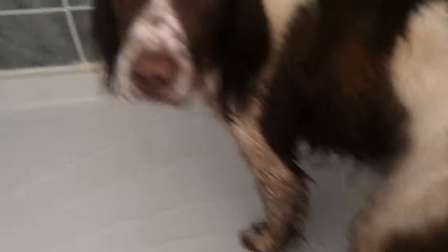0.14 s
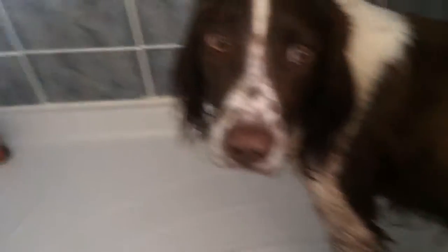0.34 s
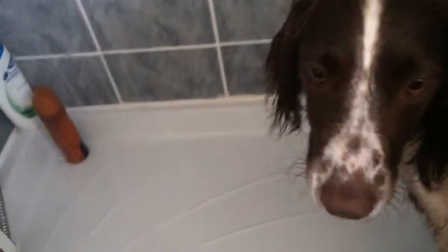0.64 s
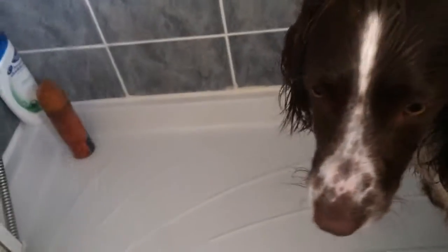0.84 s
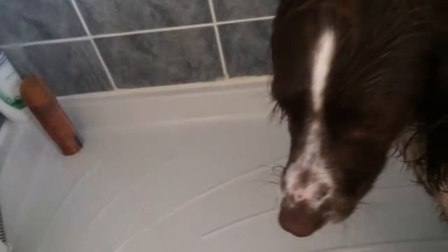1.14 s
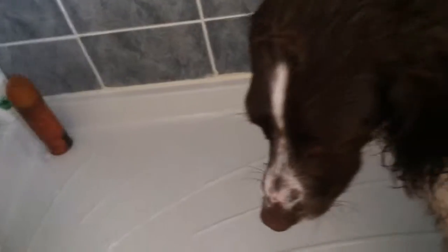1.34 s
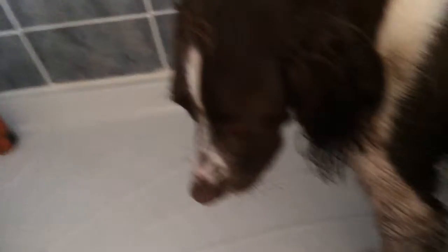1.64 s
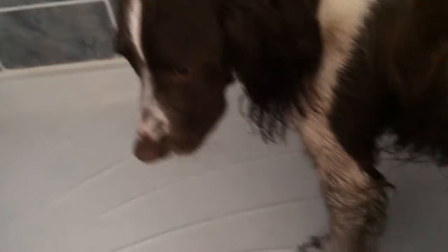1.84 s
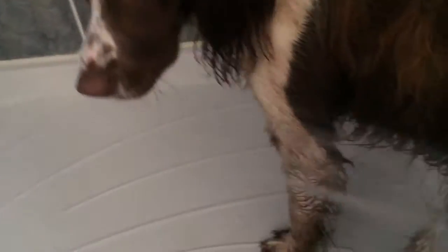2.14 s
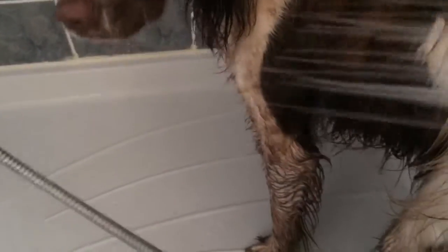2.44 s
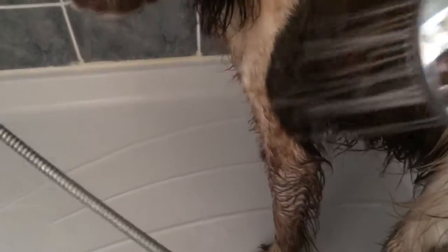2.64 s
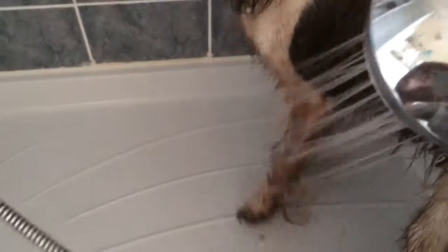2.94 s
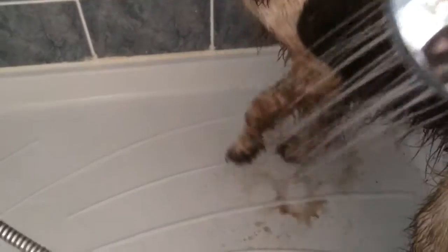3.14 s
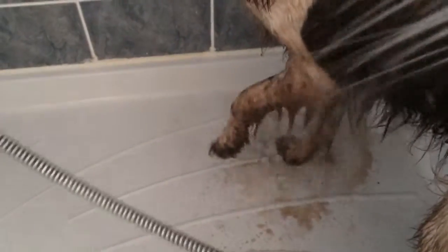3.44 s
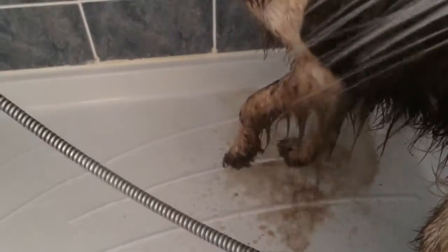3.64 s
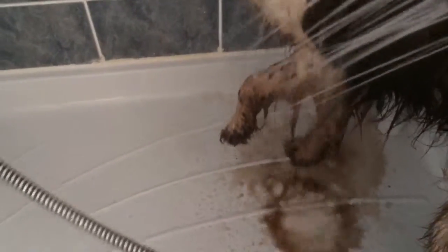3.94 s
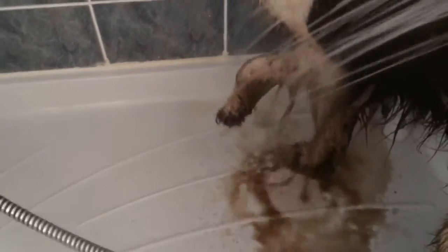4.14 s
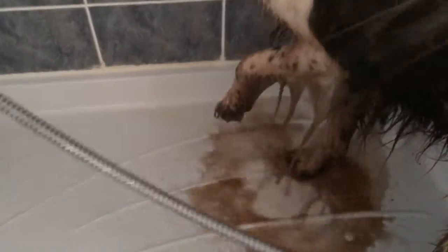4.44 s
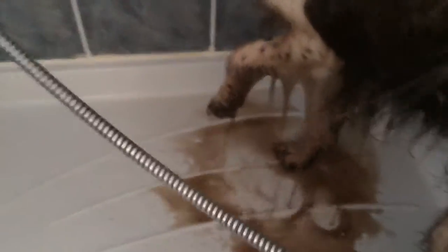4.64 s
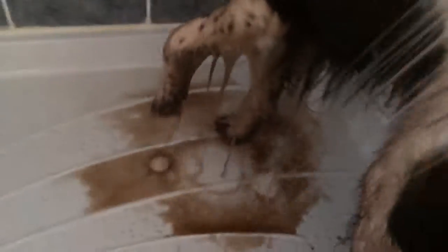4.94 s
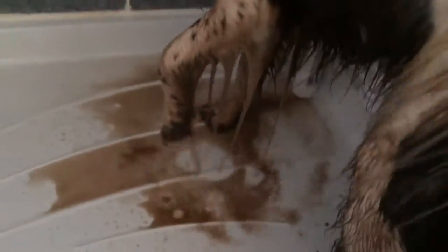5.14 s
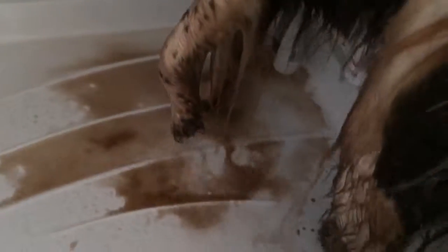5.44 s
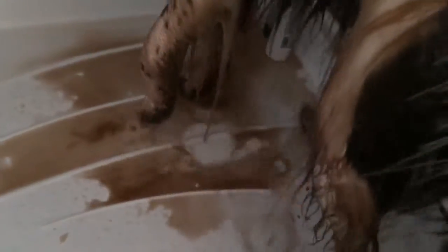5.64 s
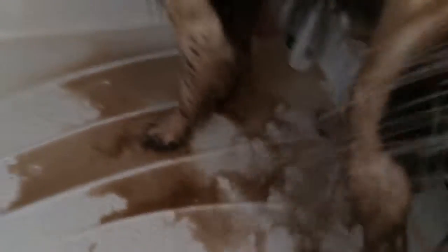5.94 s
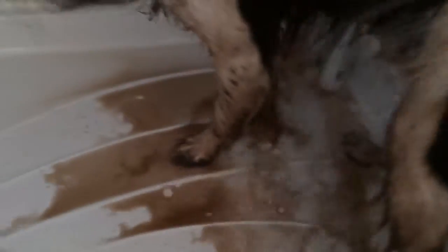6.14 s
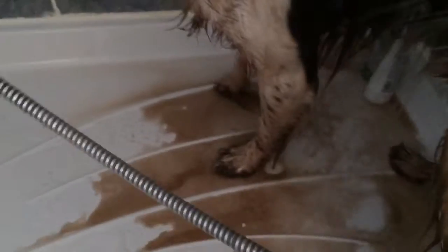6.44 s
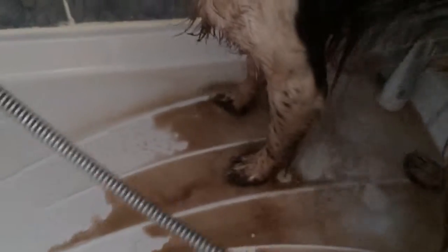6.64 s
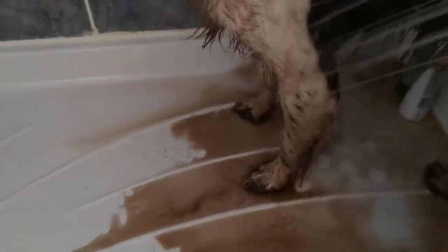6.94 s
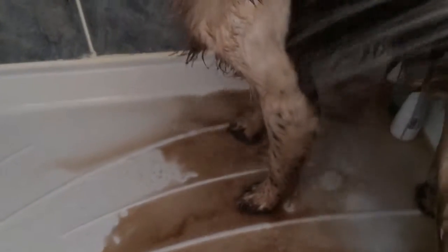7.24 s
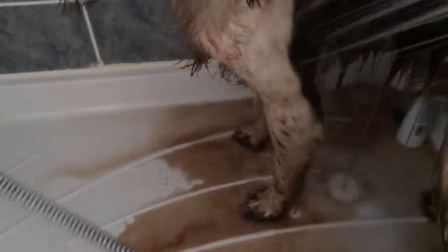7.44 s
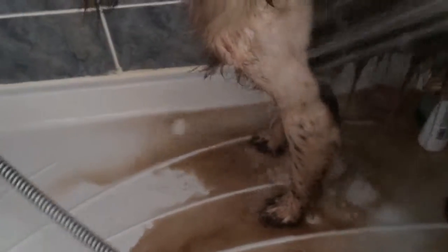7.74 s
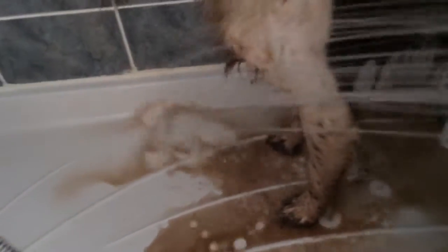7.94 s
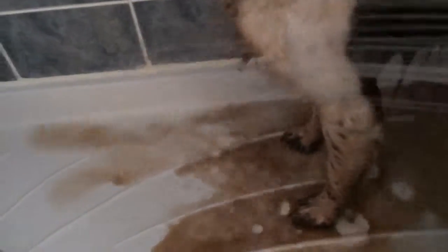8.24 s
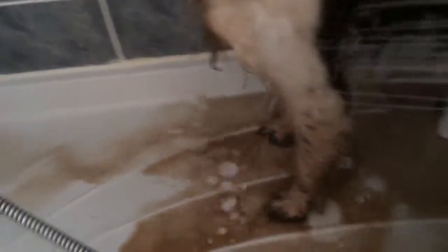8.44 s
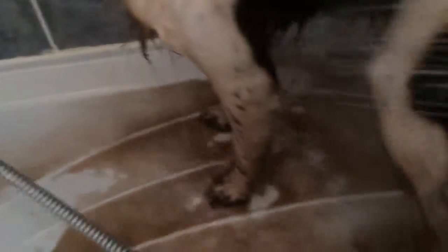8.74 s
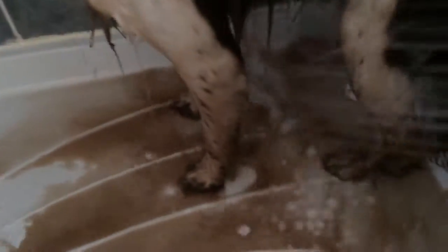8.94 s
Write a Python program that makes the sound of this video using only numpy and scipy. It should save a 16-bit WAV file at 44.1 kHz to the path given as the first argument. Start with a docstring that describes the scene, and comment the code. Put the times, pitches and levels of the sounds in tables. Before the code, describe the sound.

Close, bright shower spray sizzles over wet fur in a small tiled bathroom while runoff patters ever heavier onto a hollow plastic tray.

```python
"""A hand shower rinses a dog that stands in a plastic shower tray in a small tiled bathroom.
Its jets hiss, splash and sizzle on the wet coat: random impacts filtered to the colour of each.
Water that gets past patters on the tray, stirs the puddle and makes the shell ring over a low rumble.
Fat drops tick near the microphone, gobs slap, a claw taps once, and dull knocks come as the dog
shifts its paws. Short echoes from the tiles follow the water; both channels are alike."""
import sys
import numpy as np
from scipy import signal
from scipy.fft import rfft, irfft
from scipy.io import wavfile
from scipy.ndimage import uniform_filter1d

SR = 44100
rng = np.random.default_rng(int(sys.argv[2]) if len(sys.argv) > 2 else 0)


def persist_wave(psi):
    """Save psi, clipped to +-1, as 16-bit WAV."""
    counts = np.round(np.clip(psi, -1, 1) * 32767).astype(np.int16)
    wavfile.write(sys.argv[1], SR, np.atleast_2d(counts).T)


N = 401310

# Levels in the tables are nominal: each layer adds its own trim and drift.
# Jets on the coat, weakest while they swing off the dog: (time [s], fine spray [dB], splash [dB])
JETS = [(0, -35, -46.5), (1.05, -32, -45), (1.55, -34, -43), (1.73, -43, -48), (1.87, -39, -44),
        (2.06, -36, -37.5), (2.29, -32, -46), (2.5, -34, -37.5), (3.1, -31, -42.5), (3.42, -36, -43.5),
        (3.62, -30, -36.5), (4.2, -33.5, -39.5), (4.8, -31.5, -39.5), (5.5, -32.5, -39), (5.92, -33, -40.5),
        (6.4, -32, -39), (6.9, -32.5, -37), (7.45, -32.5, -37), (8.2, -30, -36.5), (8.65, -33, -38.5),
        (9.1, -31.5, -36)]
# Sweeps of the hand briefly swell or thin the water on coat and tray; a negative change is a dip:
# (time [s], half length [s], spray change [dB], patter change [dB])
SWEEPS = [(0.05, 0.17, 3, 0.5), (.43, 0.054, 4, 0.5), (0.592, 0.047, 4, 2), (1.39, 0.055, -0.5, 6.5),
          (1.46, 0.056, 5, 3.5), (1.53, .025, -4, 8), (1.733, 0.039, -2.5, 0), (2.266, 0.026, -7.5, 0),
          (2.658, 0.068, 5.5, 7.5), (2.74, 0.048, 4, 6), (2.902, 0.033, 2.5, 1.5), (3.03, 0.019, 1.5, 5.5),
          (3.35, 0.084, 1, 1.5), (3.95, 0.04, 4.5, 0.5), (4.133, .025, 1.5, 0), (4.317, 0.024, -0.5, 5),
          (4.454, 0.042, 4, 6), (4.74, 0.015, -4, 0.5), (4.975, 0.11, 4, 2), (5.104, 0.036, -4, 1.5),
          (5.303, 0.17, 3.5, 2), (5.743, 0.094, 3, 5.5), (6.105, 0.11, 3, -2.5), (6.505, 0.043, 4.5, 1.5),
          (6.713, 0.066, 2.5, 1.5), (6.884, 0.058, -0.5, 1), (7.344, 0.07, 0.5, 0), (7.668, 0.06, -1, -1),
          (7.835, 0.05, 3.5, -4), (8.423, 0.07, 3.5, 1), (8.795, 0.072, 3.5, 1.5)]
# The jets bite into a soaked spot and sizzle: (time [s], attack [s], decay [s], level [dB])
SIZZLES = [(0.39, .04, .04, -47), (1.505, 0.027, 0.03, -41), (1.895, 0.0092, 0.037, -38),
           (2.585, 0.055, .15, -42), (4.85, .16, 0.027, -33.5), (5.15, 0.25, .12, -44),
           (7.29, .04, 0.21, -39), (8.74, 0.077, .08, -37)]
# The jets dwell in a hollow of the wet coat, which rings:
# (time [s], half length [s], level [dB], pitch [Hz], width [octaves])
HOLLOWS = [(1.375, 0.025, -40, 2360, 0.14), (1.42, .025, -43, 1850, 0.42), (1.58, .035, -48, 2380, .25),
           (2.68, 0.04, -39, 1930, .22), (4.97, 0.034, -35, 1900, .25), (5.62, 0.2, -36.5, 1970, 0.23),
           (7.34, 0.059, -37, 2230, .25), (7.41, 0.031, -32.5, 1500, 0.31),
           (7.67, 0.079, -32.5, 1540, 0.23), (7.84, 0.074, -43.5, 1500, 0.22),
           (8.412, 0.019, -33, 1890, .2), (8.775, 0.017, -38, 1690, 0.23), (8.91, .03, -38, 1930, .25),
           (9.075, .02, -45, 2100, .25)]
# Water that gets past the dog and patters on the tray: (time [s], level [dB])
RUNOFF = [(0, -42.5), (1.25, -40.5), (1.55, -45), (1.65, -48), (1.83, -47), (1.92, -40.5), (2.15, -38.5),
          (2.3, -44.5), (2.55, -44.5), (2.8, -39), (3.2, -41), (3.38, -37.5), (3.5, -36.5), (3.85, -35.5),
          (4.25, -39), (4.75, -37.5), (5.15, -40.5), (5.42, -34.5), (5.77, -38), (5.98, -36.5), (6.38, -31),
          (7.15, -35), (7.7, -34), (7.95, -41.5), (8.33, -41), (8.36, -38), (8.55, -37.5), (8.66, -39.5),
          (8.82, -37.5), (9.1, -38)]
# The patter brightens on a thin film and darkens on deeper water: (time [s], centre [Hz])
FILM_PITCH = [(0, 1690), (1.18, 1560), (1.38, 1750), (2.3, 1630), (2.62, 1820), (2.8, 1720), (3.6, 1850),
              (3.86, 1440), (4.1, 1640), (5.15, 1800), (5.4, 1500), (5.98, 1800), (6.15, 1510), (6.9, 1500),
              (7.12, 1780), (7.65, 1600), (8.45, 1890), (8.58, 1410), (8.74, 1560), (8.92, 1850),
              (9.1, 1900)]
# A stream digs into the puddle and churns it: (time [s], half length [s], level [dB])
PLUNGES = [(2.11, .06, -52), (2.85, 0.65, -54.5), (3.84, 0.16, -47), (4.49, 0.063, -46),
           (6.52, 0.33, -43.5), (6.8, 0.23, -40.5), (7.25, 0.031, -39), (7.58, 0.16, -41.5),
           (8.58, 0.066, -45), (8.72, 0.11, -48)]
# Water drums on the plastic shell, strongest at the start, weaker and uneven later:
# (time [s], level [dB])
DRUMMING = [(0, -45), (1.4, -45), (1.66, -50), (1.78, -56.5), (2.6, -58.5), (3.12, -51.5), (3.7, -55),
            (5.55, -59), (6.0, -53), (7.2, -52), (7.8, -55.5), (9.1, -52.5)]
# Low rumble of the flow: (time [s], level [dB])
FLOW = [(0, -55), (2.2, -55.5), (2.7, -62), (3.2, -58.5), (4.2, -53.5), (5.2, -58.5), (6.0, -54),
        (9.1, -56)]
# The jets cross bare plastic and make it boom:
# (time [s], half length [s], level [dB], pitch [Hz], width [octaves])
BOOMS = [(1.08, .05, -45, 370, 0.34), (1.18, 0.047, -37.5, 350, 0.19), (1.31, .035, -41, 343, 0.24),
         (1.39, 0.073, -37, 428, 0.23), (1.44, 0.08, -39.5, 360, 0.28), (1.655, 0.047, -48.5, 340, .6),
         (2.25, 0.092, -57.5, 420, 0.44), (5.15, 0.19, -54, 455, 0.3), (5.3, 0.038, -53, 390, .7)]
# Modes of the tray: (pitch [Hz], level [dB], 60 dB decay [s])
TRAY_MODES = [(63, -22, 0.23), (81.7, -3, 0.37), (119, -3.5, 0.19), (157.4, 4.5, 0.14), (172.3, 3.5, 0.44),
              (218, 0, 0.45), (244.8, 2.5, 0.68), (280.4, 1.5, 0.12), (321.8, 0, 0.45), (352, -3, 0.29),
              (390, -3.5, 0.24), (418.7, 1.5, 0.17), (466, 1.5, 0.082), (507, 0.5, 0.11), (590, 0, 0.15),
              (647, -2, 0.073), (710, -0.5, 0.096)]
# Single fat drops near the microphone: (time [s], peak [dB], pitch [Hz], fade of the crack [s])
DROPS = [(0.02, -16.5, 9000, .002), (0.079, -14.5, 9800, .002), (0.28, -19, 10000, .001),
         (0.43, -18, 9400, 0.00089), (0.517, -19, 11500, .0006), (0.566, -16, 12200, .002),
         (0.58, -15, 8500, .002), (0.637, -16, 12600, .0015), (0.714, -20, 9500, .002),
         (0.773, -13, 11500, .0006), (1.201, -16, 11600, .0015), (2.028, -24, 6500, .002),
         (2.314, -22, 7500, .002), (2.875, -19, 12000, .001), (2.906, -19, 8500, .001),
         (2.981, -22, 7950, 0.0019), (3.11, -15.5, 9300, .002), (3.318, -19, 11600, .0008),
         (3.858, -16, 10000, .0003), (3.97, -13, 10400, .0005), (4.126, -19, 10000, .0004),
         (4.432, -19, 10000, .0003), (4.596, -14, 11500, .0006), (5.279, -11, 12300, .0007),
         (6.618, -19.5, 5500, .002), (6.663, -15, 11200, .0015), (6.745, -14, 11500, .0002),
         (7.015, -18.5, 10100, .002), (7.075, -19, 5700, .002), (7.152, -19, 6400, 0.0018),
         (7.68, -21, 9000, .002), (7.874, -12, 7350, 0.0022), (7.939, -13, 10300, .0005),
         (8.22, -19, 5000, .002), (8.375, -25, 7440, 0.0018), (8.5, -16, 11400, .0007),
         (8.895, -13, 10100, .001), (9.02, -21, 5500, 0.0022)]
# Gobs of water slapping the tray:
# (time [s], peak [dB], pitch [Hz], width [octaves], gain of the tail [dB])
SLAPS = [(0.411, -29, 2300, 0.37, -20), (0.684, -33, 975, 0.23, -17), (1.347, -25, 1390, 2.1, 3),
         (1.517, -25, 2460, 1.3, -1), (2.624, -18, 3600, 0.58, -20), (2.723, -22, 1800, .8, 0),
         (2.891, -34, 1100, .6, -12), (3.035, -22.5, 1700, 0.55, -5), (3.838, -23, 1350, 0.54, -7),
         (6.497, -23, 1350, .7, -10), (6.55, -19, 1400, .8, -10), (6.803, -21.5, 990, .6, -10),
         (6.863, -20, 4300, 0.6, -8), (7.251, -24, 1250, .7, -13), (7.0, -22, 1560, .5, -12),
         (8.572, -27, 1100, 0.47, -8)]
# Dull knocks on the tray: (time [s], peak [dB], pitch of the push [Hz], ring against the push [dB])
KNOCKS = [(1.029, -29, 80, 18), (1.083, -33, 140, 18), (1.176, -27.5, 119, 20), (5.897, -36, 159, -8),
          (7.096, -36.5, 135, -9), (8.66, -34.5, 125, -2), (9.06, -43, 165, 1)]
# A claw taps the tray: (peak [dB], pitch of the tick [Hz], ring against the tick [dB])
TAP = (-23.5, 2100, 1.5)
# What the tap rings with: (pitch [Hz], level [dB], 60 dB decay [s])
TAP_MODES = [(1626, -1, 0.091), (1770, -7, .07), (1560, -6, .08)]
# Colours of the impacts, relative levels: (frequency [Hz], level per Hz [dB])
MIST_COLOUR = [(2500, -56), (5000, -9), (7000, -4.5), (9000, -1.5), (11000, 2.5), (13000, 3), (15000, 4.5),
               (17000, 0.5)]
SPLASH_COLOUR = [(1500, -23), (2400, -0.5), (3200, -9.5), (4300, 2.5), (5500, 0), (7000, 4.5), (9000, 0),
                 (14000, -10.5)]
SIZZLE_COLOUR = [(2000, -16), (2700, -9), (3050, -3.5), (3400, -1), (3900, -1), (4400, -6), (4900, -11.5),
                 (8000, -14.5)]
PATTER_COLOUR = [(600, -14.5), (950, -13), (1250, 1), (1550, -0.5), (1800, -0.5), (2150, -0.5),
                 (2400, -1.5), (2700, -3), (4000, 1), (8000, -39.5)]
PUDDLE_COLOUR = [(350, -27), (560, -12.5), (660, -3), (820, 0), (950, 3.5), (1100, 3.5), (1350, -3),
                 (1700, -10), (2500, -12.5)]
RUMBLE_COLOUR = [(20, -23), (45, -12), (62, -3), (82, 2), (98, -3.5), (112, 4), (135, -10.5), (172, -3),
                 (200, -7.5), (400, -18), (1000, -27.5)]

SPLASH_TYPICAL_DB = -40  # splash level from which the force of the jets is counted
SPLASH_SHARE = 0.7  # share of a sweep's spray change that the coarser splash follows
TICKS_PER_S, TICK_DB = 76, -10  # larger drops flung off the coat; level against the splash
PRICKS_PER_S, PRICK_DB = 200, -14  # small hard droplets near by; level against the fine spray
PUDDLE_UNDER_PATTER_DB = -13.5  # between plunges the puddle stirs with the patter
PUDDLE_UNDER_DRUMMING_DB = -2  # and with the water that drums on the shell
# lumps in the runoff: their power against the steady drops, reached at this level of flow
GOB_SHARE, GOB_FULL_DB = 0.51, -38
# gain and length of a drop's scatter against its crack; width of both
DROP_TAIL_DB, DROP_TAIL_RATIO, DROP_OCTAVES = -11, 8.9, 0.99
# a slap's contact, the ring of the tray after it, the ring's pitch against the slap's
SLAP_FADE_S, SLAP_TAIL_S, SLAP_TAIL_PITCH = 0.0085, 0.055, 0.886
TAP_S = 1.6586
BATHROOM_T60_S, TILE_CUT_HZ = 0.46, 3300
CUTOFF_HZ = 15350


def from_db(db):
    """Decibels to gain."""
    return 10 ** (np.asarray(db) / 20)


def rms_one(x):
    """Scale to unit power."""
    return x / np.sqrt(np.mean(x ** 2) + 1e-20)


def in_time(rows):
    """One value per sample for each column of a curve."""
    s, *columns = np.transpose(rows)
    return [np.interp(np.arange(N) / SR, s, column) for column in columns]


def drift(rate):
    """Slow chance with spread 1: noise low-passed at about rate in Hz."""
    step = 40  # samples between the points of the slow curve
    r = np.exp(-2 * np.pi * step * rate / SR)
    noise = rng.standard_normal(N // step + 2002)
    slow = signal.lfilter([1], [1, -2 * r, r * r], noise)[2000:]  # drop the settling time
    return np.interp(np.arange(N) / step, np.arange(len(slow)), rms_one(slow))


def colour(x, spectrum, size=2048):
    """Causal (minimum-phase) filter with the given spectrum; rms 1."""
    hz, db = np.transpose(spectrum)
    grid = np.maximum(np.arange(size // 2 + 1) * SR / size, 1)
    # past either end of the table it falls 10 dB an octave
    octaves_beyond = np.abs(np.log2(grid / np.clip(grid, hz[0], hz[-1])))
    grid_db = np.interp(np.log(grid), np.log(hz), db) - 10 * octaves_beyond
    # folding the cepstrum onto positive time gives minimum phase
    cepstrum = irfft(np.log(from_db(grid_db)))
    cepstrum[1:size // 2] *= 2
    cepstrum[size // 2 + 1:] = 0
    response = irfft(np.exp(rfft(cepstrum)))
    return rms_one(signal.oaconvolve(x, response)[:N])


def band(x, hz, octaves):
    """Keep a band of some octaves around a pitch."""
    edges = hz * 2 ** (np.array([-.5, .5]) * octaves)
    edges = np.minimum(edges, [.4 * SR, .45 * SR])
    return signal.sosfilt(signal.butter(2, edges, "band", fs=SR, output="sos"), x)


def high_pass(x, hz, order):
    """Keep what lies above a frequency."""
    return signal.sosfilt(signal.butter(order, hz, "high", fs=SR, output="sos"), x)


def ring(x, hz, t60):
    """A unit click sets a sine of height 1 ringing, 60 dB down after t60 seconds."""
    r, w = from_db(-60 / (t60 * SR)), 2 * np.pi * hz / SR
    return signal.lfilter([0, np.sin(w)], [1, -2 * r * np.cos(w), r * r], x + 1e-18)


def moving_resonance(x, hz, width_hz, size=256):
    """A two-pole resonance whose centre follows hz block by block; rms 1."""
    r = np.exp(-np.pi * width_hz / SR)
    state, out = [0., 0.], np.zeros(N)
    for i in range(0, N, size):
        poles = [1, -2 * r * np.cos(2 * np.pi * hz[i] / SR), r * r]
        out[i:i + size], state = signal.lfilter([1, 0, -1], poles, x[i:i + size], zi=state)
    return rms_one(out)


def impacts(per_s, spread_db):
    """Drops land at random as clicks of either sign, their sizes in dB spread exponentially; rms 1."""
    sizes = from_db(spread_db * np.minimum(rng.exponential(1, N), 5))
    signs = rng.choice([-1, 1], N)
    return rms_one(sizes * signs * (rng.random(N) < per_s / SR))


def ticks(spectrum, per_s, spread_db, fade_s):
    """Drops shatter: each is noise that starts at once and fades in milliseconds; rms 1."""
    hits = impacts(per_s, spread_db) ** 2 + 1e-18
    power = signal.lfilter([1], [1, -np.exp(-2 / (fade_s * SR))], hits)
    return colour(np.sqrt(power) * rng.standard_normal(N), spectrum)


def gobs(per_s, spread_db, fade_s):
    """Power of random lumps of water, each landing at once and dying away; mean about 1."""
    keep = np.exp(-2 / (fade_s * SR))
    return signal.lfilter([1 - keep], [1, -keep], impacts(per_s, spread_db) ** 2 + 1e-18)


def bubbles(per_s, low_hz, high_hz, cycles, spread_db, size=2048):
    """Each trapped bubble rings for some cycles at a pitch of its own, rising a little; rms 1."""
    out, t = np.zeros(N + size), np.arange(size) / SR
    for when, pitch, chance in rng.random((int(per_s * N / SR), 3)):
        turns = low_hz * (high_hz / low_hz) ** pitch * t
        age = turns / cycles  # 1 when the ring is 60 dB down
        loudness = from_db(spread_db * min(-np.log(1 - chance), 4))
        tone = np.sin(2 * np.pi * turns * (1 + .04 * age))
        at = int(when * N)
        out[at:at + size] += loudness * tone * from_db(-60 * age)
    return rms_one(out[:N])


def burst(fade_s, size=8192):
    """A contact: noise, as of a cluster of tiny impacts, that dies away."""
    return rng.standard_normal(size) * np.exp(-np.arange(size) / (fade_s * SR))


def add(out, s, sound, peak_db):
    """Mix a short sound in at time s with the given peak."""
    at = round(s * SR)
    out[at:at + len(sound)] += (from_db(peak_db) * sound / np.abs(sound).max())[:N - at]


def swell(s, half_s):
    """A bell-shaped rise and fall of height 1 around time s."""
    out = np.zeros(N)
    first = max(int((s - 4 * half_s) * SR), 0)
    last = min(int((s + 4 * half_s) * SR), N)
    near = np.arange(first, last)
    out[near] = np.exp(-((near / SR - s) / half_s) ** 2)
    return out


def swells(rows):
    """Summed gain of swells; rows are (time [s], half length [s], level [dB])."""
    return sum(from_db(db) * swell(s, half_s) for s, half_s, db in rows)


def hums(rows):
    """A rain of drops keeps resonances going for a moment each; rows as in HOLLOWS and BOOMS."""
    rain = impacts(per_s=3000, spread_db=3.0) + 1e-18
    out = np.zeros(N)
    for s, half_s, db, hz, octaves in rows:
        out += from_db(db) * swell(s, half_s) * rms_one(band(rain, hz, octaves))
    return out


def sweep_changes():
    """Change in dB that sweeps of the hand make to the spray and to the patter; negative is a dip."""
    return sum(np.outer(changes_db, swell(s, half_s)) for s, half_s, *changes_db in SWEEPS)


def spray(change_db):
    """Thousands of droplets a second burst on the coat, in flurries as the jets sweep over tufts of fur."""
    mist_db, splash_db = in_time(JETS)
    tufts_db = 0.5 * drift(19)
    mist_db = mist_db + change_db + tufts_db + 1.3 * drift(12)
    splash_db = splash_db + SPLASH_SHARE * change_db + tufts_db
    flurry = drift(59)
    return (fine_spray(mist_db, flurry) + splashes(splash_db, flurry) + sizzle(splash_db)
            + flung_drops(splash_db))


def fine_spray(mist_db, flurry):
    """Fine droplets hiss as dense small impacts, with sparser hard droplets pricking through near by."""
    mist = colour(impacts(per_s=16000, spread_db=3.5), MIST_COLOUR)
    pricks = ticks(MIST_COLOUR, PRICKS_PER_S, spread_db=-2.5, fade_s=0.00039)
    mist = mist + from_db(PRICK_DB) * pricks
    # the finest droplets hang in the air and follow the jets only loosely
    finest = high_pass(mist, 11000, order=1)
    loose_db = uniform_filter1d(mist_db, size=6000) + 0.43 * drift(25)
    direct_gain = from_db(mist_db + 1.1 + 0.95 * flurry)
    finest_gain = from_db(loose_db - 0.3 + 0.28 * flurry)
    return (mist - finest) * direct_gain + finest * finest_gain


def splashes(splash_db, flurry):
    """Coarser drops burst on the coat, a little less spread in level than the jets."""
    force_db = splash_db - SPLASH_TYPICAL_DB
    level_db = splash_db - 0.12 * force_db - 1.5 + 0.18 * flurry + 1.7 * drift(3.7)
    return colour(impacts(per_s=5000, spread_db=2.0), SPLASH_COLOUR) * from_db(level_db)


def sizzle(splash_db):
    """Sizzling grows faster with the force of the jets than splashing does, and surges on soaked spots."""
    force_db = splash_db - SPLASH_TYPICAL_DB
    gain = np.hypot(from_db(splash_db + 0.4 * force_db - 6.0), sizzle_surges())
    grains = colour(impacts(per_s=5000, spread_db=2.5), SIZZLE_COLOUR)
    return grains * gain * from_db(1.6 * drift(8.0))


def sizzle_surges():
    """Gain of the sizzles: each rises straight and dies away."""
    t, gain = np.arange(N) / SR, np.zeros(N)
    for s, attack_s, decay_s, db in SIZZLES:
        rise = np.clip((t - s) / attack_s, 0, 1)
        fall = np.exp(-np.maximum(t - s - attack_s, 0) / decay_s)
        gain += from_db(db) * rise * fall
    return gain


def flung_drops(splash_db):
    """Larger drops flung off the coat shatter one by one."""
    drops = ticks(SPLASH_COLOUR, TICKS_PER_S, spread_db=3.0, fade_s=0.0048)
    return drops * from_db(splash_db + TICK_DB)


def runoff(change_db):
    """Drops slap the film on the tray and stir the puddle; heavy runoff lands in lumps and traps bubbles."""
    steady_db, = in_time(RUNOFF)
    # only a heavy runoff falls in lumps and traps many bubbles
    weight = from_db(np.minimum(steady_db - GOB_FULL_DB, 0))
    return patter(steady_db + change_db, weight) + puddle(steady_db, weight) + hums(HOLLOWS)


def patter(patter_db, weight):
    """Drops and bubbles on the film of water sound through a resonance that moves with its depth."""
    film_hz = in_time(FILM_PITCH)[0] + 70 * drift(7.6)
    gush = drift(6.6)
    lumps = GOB_SHARE * weight ** 2 * gobs(per_s=36, spread_db=-1.5, fade_s=0.017)
    drops = impacts(per_s=6000, spread_db=0.5) * np.sqrt(1 + lumps)
    trapped = bubbles(per_s=130, low_hz=1104, high_hz=2420, cycles=114, spread_db=-0.2)
    film = colour(drops + weight * from_db(-13.0) * trapped, PATTER_COLOUR)
    return moving_resonance(film, film_hz, width_hz=770) * from_db(patter_db - 0.82 + 0.41 * gush)


def puddle(steady_db, weight):
    """Patter, drumming water and plunging streams churn the puddle, which traps deeper bubbles."""
    drumming_db, = in_time(DRUMMING)
    stirring = [from_db(steady_db + PUDDLE_UNDER_PATTER_DB),
                from_db(drumming_db + PUDDLE_UNDER_DRUMMING_DB),
                swells(PLUNGES)]
    gain = np.linalg.norm(stirring, axis=0)  # their powers add
    trapped = bubbles(per_s=110, low_hz=636, high_hz=1448, cycles=66, spread_db=0.0)
    pool = impacts(per_s=3500, spread_db=2.0) + weight * from_db(-16.5) * trapped
    return colour(pool, PUDDLE_COLOUR) * gain * from_db(1.0 + 0.85 * drift(55))


def tray():
    """The plastic shell rings under the water, over the low rumble of the flow."""
    level_db, = in_time(DRUMMING)
    flow_db, = in_time(FLOW)
    rain = impacts(per_s=3500, spread_db=-1.0)
    shell = np.zeros(N)
    for k, (hz, db, t60) in enumerate(TRAY_MODES):
        shell += (-1) ** k * from_db(db) * rms_one(ring(rain, hz, t60))
    # small drops are too light to move the lowest modes much
    shell = rms_one(high_pass(shell, 230, order=2))
    rumble = colour(impacts(per_s=3300, spread_db=4.0), RUMBLE_COLOUR, size=8192)
    return shell * from_db(level_db - 0.5) + hums(BOOMS) + from_db(flow_db) * rumble


def bathroom(x, size=22050, count=4):
    """Dense echoes between the tiles, duller as they die, in a pattern that drifts; unit gain."""
    t, out = np.arange(size) / SR, 0
    places = np.array([drift(2.02) for _ in range(count)])
    low_pass = signal.butter(1, TILE_CUT_HZ, fs=SR, output="sos")
    for share in places / np.linalg.norm(places, axis=0):
        echoes = rng.standard_normal(size) * (t > .003)  # first echo after 3 ms
        dull = signal.sosfilt(low_pass, echoes)
        # the treble dies twice as fast
        tail = dull * from_db(-60 * t / BATHROOM_T60_S)
        tail = tail + (echoes - dull) * from_db(-120 * t / BATHROOM_T60_S)
        out = out + signal.oaconvolve(x * share, tail / np.linalg.norm(tail))[:N]
    return out


def single_drops():
    """Fat drops near the microphone tick sharply: a short crack and a longer, weaker scatter."""
    out = np.zeros(N)
    for s, peak_db, hz, fade_s in DROPS:
        scatter = from_db(DROP_TAIL_DB) * burst(DROP_TAIL_RATIO * fade_s)
        add(out, s, band(burst(fade_s) + scatter, hz, DROP_OCTAVES), peak_db)
    return out


def slaps():
    """Gobs of water slap the tray and leave a lower, narrower ring."""
    out = np.zeros(N)
    for s, peak_db, hz, octaves, tail_db in SLAPS:
        hit = band(10 * signal.unit_impulse(8192) + burst(SLAP_FADE_S), hz, octaves)
        tail = band(burst(SLAP_TAIL_S), hz * SLAP_TAIL_PITCH, octaves / 2)
        add(out, s, hit + from_db(tail_db) * tail, peak_db)
    return out


def knocks(size=22050):
    """A soft, heavy contact makes the tray thud and wakes its low modes, unless the paw stays and damps them."""
    out = np.zeros(N)
    for s, peak_db, hz, ring_db in KNOCKS:
        contact = signal.unit_impulse(size) + 0.015 * burst(fade_s=0.042, size=size)
        push = band(contact, hz, octaves=1.18)
        modes = np.zeros(size)
        for k, (mode_hz, db, t60) in enumerate(TRAY_MODES):
            # each knock wakes the modes in a slightly different balance
            modes += from_db(db + rng.normal(0, 1.9)) * (-1) ** k * ring(push, mode_hz, t60)
        thud = ring(push, hz=88, t60=0.09)
        ringing = rms_one(modes - from_db(-2.0) * thud)
        add(out, s, rms_one(push) + from_db(ring_db) * ringing, peak_db)
    return out


def claw_tap(size=8192):
    """A thin, hard tick leaves a narrow ring in the plastic, which scatters into a lower tail."""
    peak_db, hz, ring_db = TAP
    out = np.zeros(N)
    contact = signal.unit_impulse(size) + 0.05 * burst(fade_s=0.0018, size=size)
    tick = band(contact, hz, octaves=0.6)
    modes = sum(from_db(db) * ring(tick, mode_hz, t60) for mode_hz, db, t60 in TAP_MODES)
    tail = band(burst(fade_s=0.045, size=size), hz=1560, octaves=0.4)
    sound = rms_one(tick) + from_db(ring_db) * rms_one(modes) + from_db(0.5) * rms_one(tail)
    add(out, TAP_S, sound, peak_db)
    return out


def scene():
    """A close perspective: the water leads its tile echoes, tray and knocks stay dry; channels alike."""
    spray_change_db, patter_change_db = sweep_changes()
    water = spray(spray_change_db) + runoff(patter_change_db)
    water = water + single_drops() + slaps() + claw_tap()
    mono = water + from_db(-11.5) * bathroom(water) + tray() + knocks()
    return np.array([mono, mono])


def record(dry):
    """The top is cut steeply by an elliptic low-pass."""
    return signal.sosfilt(signal.ellip(14, .1, 80, CUTOFF_HZ, fs=SR, output="sos"), dry)


dry = scene()
out = record(dry)
persist_wave(out)
```